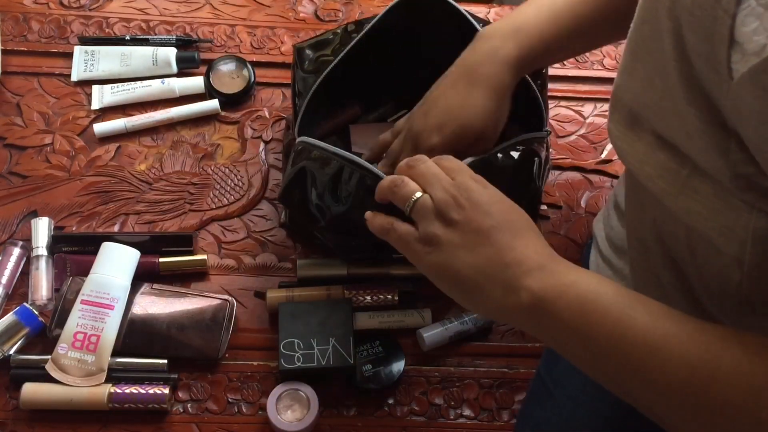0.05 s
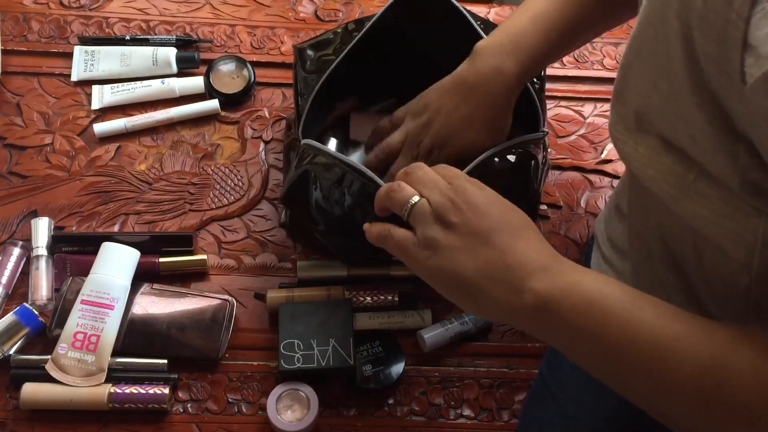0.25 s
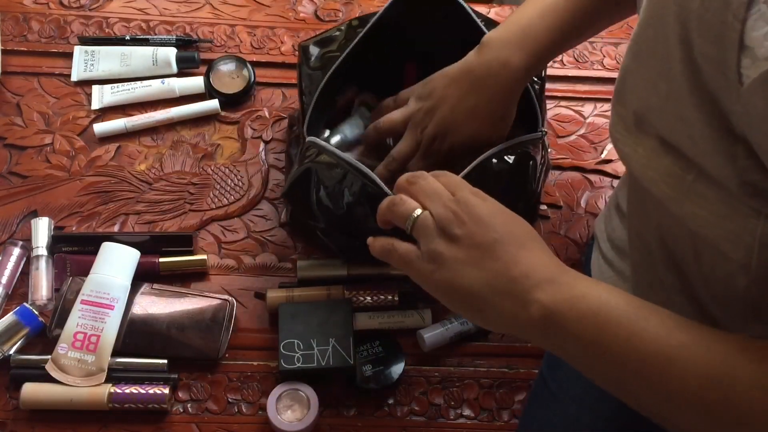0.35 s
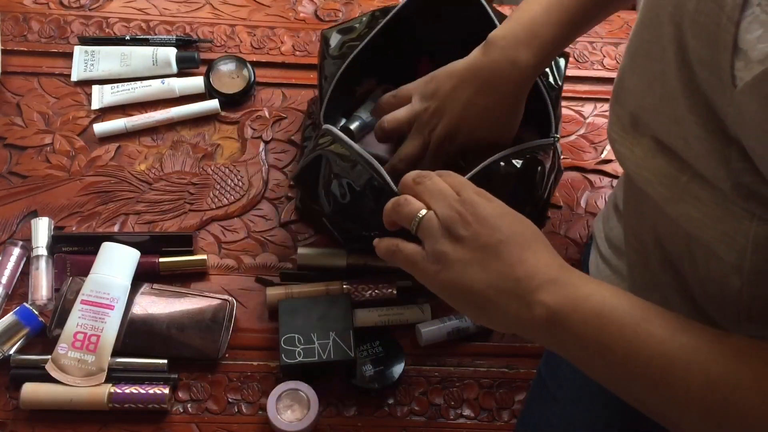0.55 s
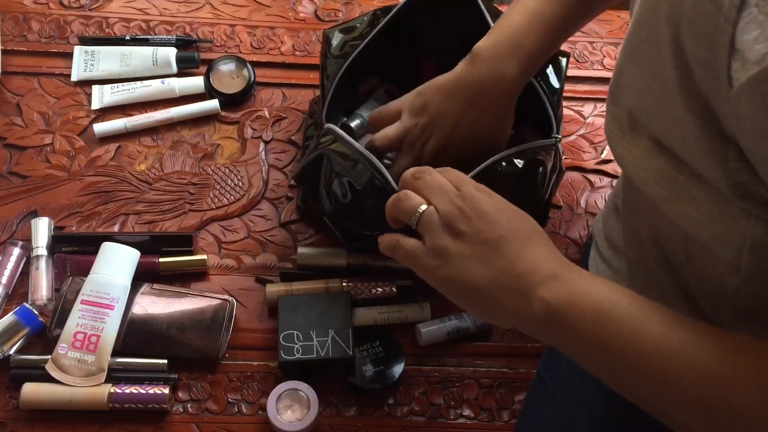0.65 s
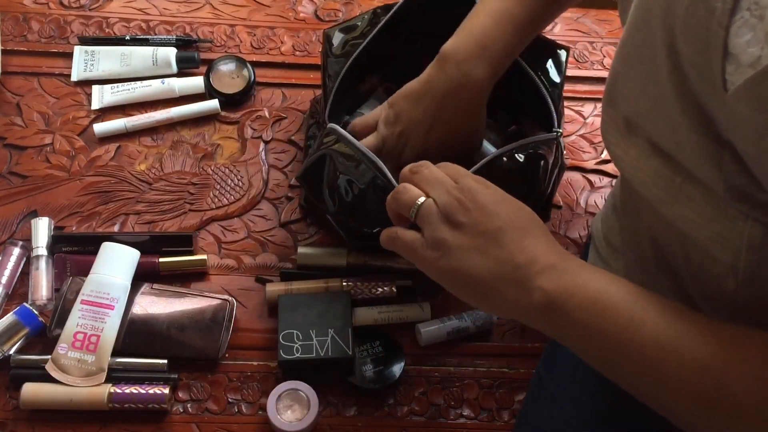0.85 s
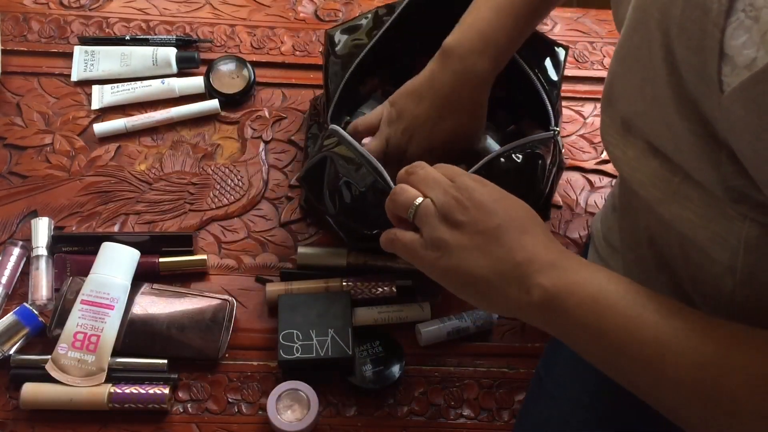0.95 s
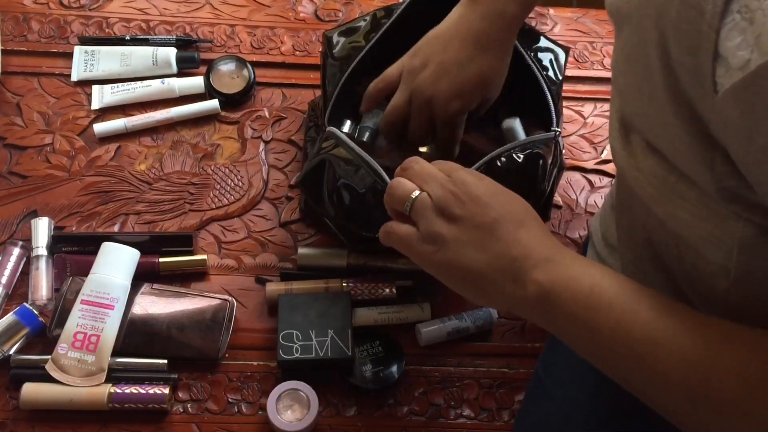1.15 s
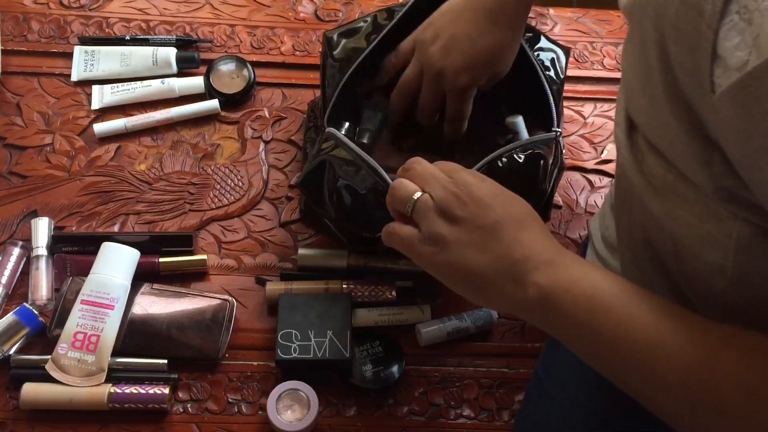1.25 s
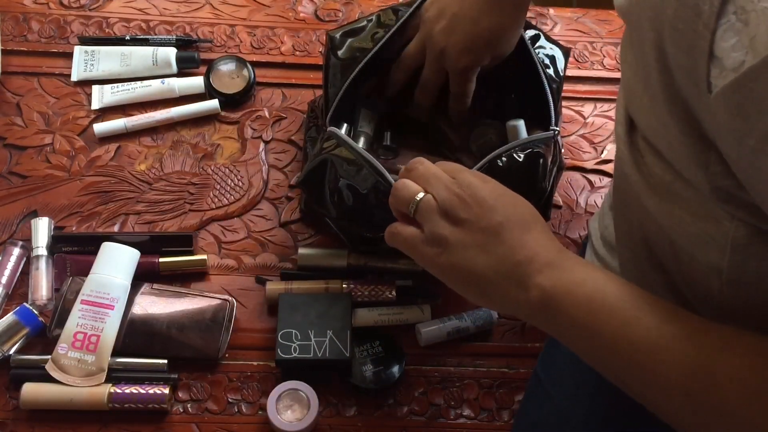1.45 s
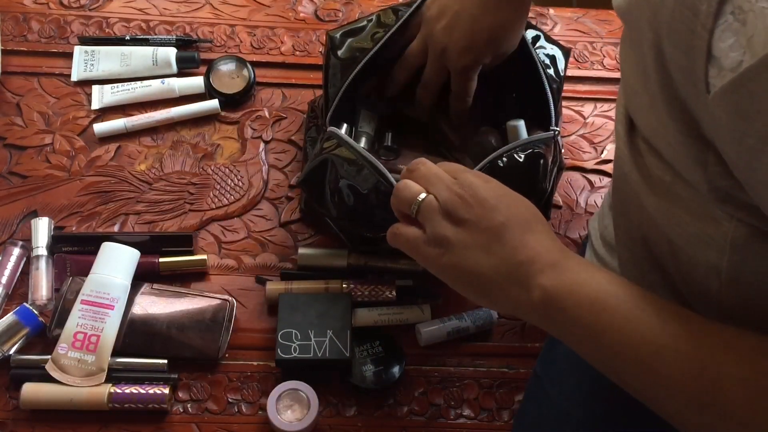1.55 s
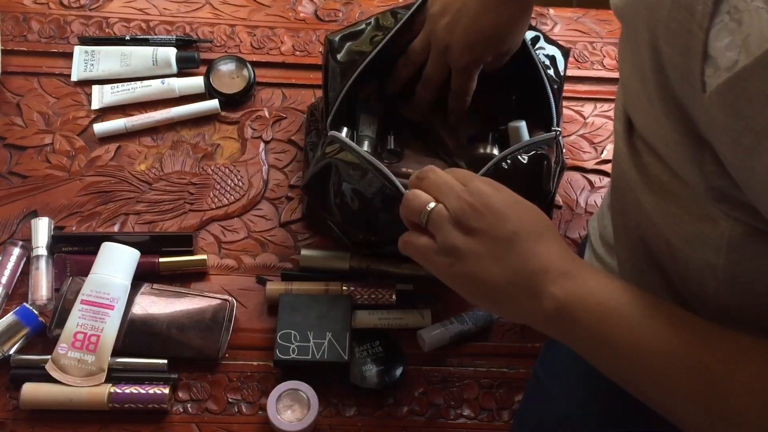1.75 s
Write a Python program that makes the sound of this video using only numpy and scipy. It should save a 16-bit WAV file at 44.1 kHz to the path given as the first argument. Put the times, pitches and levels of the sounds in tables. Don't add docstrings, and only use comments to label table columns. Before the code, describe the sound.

A hand rummages in a vinyl makeup bag: plastic caps click, hollow cases knock and small pieces rattle in two bursts, with soft thumps on a wooden table, close microphone, quiet small room.

```python
import sys
import numpy as np
from scipy import signal
from scipy.fft import rfft, irfft, next_fast_len
from scipy.io import wavfile
from scipy.ndimage import map_coordinates

SR = 44100
rng = np.random.default_rng(int(sys.argv[2]) if len(sys.argv) > 2 else 0)


def gain_from_db(level_db):
    decades = np.asarray(level_db, float) / 20
    return 10 ** decades


def master_out(mix):
    frames = np.transpose(np.atleast_2d(mix))
    ceiling = np.clip(frames, -1, 1)
    pcm = np.round(ceiling * 32767).astype(np.int16)
    wavfile.write(sys.argv[1], SR, pcm)


N = 79380


def unit(x):
    return x / np.sqrt(np.mean(x ** 2) + 1e-20)


def along(points, hz):
    f, v = np.transpose(points)
    return np.interp(np.log(hz + 1), np.log(f + 1), v)


def coloured(x, spectrum):
    m = next_fast_len(N + 8192)
    gain = gain_from_db(along(spectrum, np.fft.rfftfreq(m, 1 / SR)))
    return unit(irfft(rfft(x, m) * gain, m)[:N])


# (frequency [Hz], density [dB per Hz])
HISS_SPECTRUM = [(24, -39.5), (40, -2.5), (2700, -23.5), (3470, -22), (5050, -24.5), (5580, -25),
                 (16000, -35)]


def hiss():
    return gain_from_db(-56) * coloured(rng.standard_normal(N), HISS_SPECTRUM)


# (time [s], level [dB])
HAND_STIRRING = [(0, -46.5), (0.072, -76), (.17, -59.5), (0.219, -44), (.37, -41), (0.436, -23.5),
                 (0.549, -37.5), (.69, -56.5), (.76, -47.5), (.86, -60.5), (0.962, -55), (1.04, -32),
                 (1.162, -43), (1.3, -31.5), (1.45, -37.5), (1.587, -47.5), (1.64, -74), (1.8, -48)]
# (frequency [Hz], density [dB per Hz])
HEAP_SPECTRUM = [(24, -49), (40, -6), (91, 6.5), (176, -11.5), (354, -10), (2380, -16), (4240, -28),
                 (13400, -33.5), (16000, -47.5)]


def chatter(count=3000):
    hand_db = np.interp(np.arange(N) / SR, *np.transpose(HAND_STIRRING))
    samples = np.arange(500)[None]
    u, t = rng.random((count, 4)), samples / SR
    start, hz = (u[:, 0] * N).astype(int), 250 * 60 ** u[:, 1:2]
    size = gain_from_db(along(HEAP_SPECTRUM, hz) + 4.15 * np.log2(hz / 1000) + 11.7 * u[:, 2:3] ** 3)
    decay = gain_from_db(-60 * t * hz / (5 + 9 * u[:, 3:]))
    onset = 1 - np.exp(-t * hz * 2.0)
    grains = size * decay * np.sin(2 * np.pi * hz * t) * onset
    ticks = np.bincount((start[:, None] + samples).ravel(), grains.ravel(), N)[:N]
    lumps = map_coordinates(rng.standard_normal(200), [np.arange(N) * 60 / SR])
    slide = coloured(rng.standard_normal(N), HEAP_SPECTRUM) * gain_from_db(7.5 * lumps)
    return gain_from_db(hand_db) * (gain_from_db(1.5) * unit(ticks) + gain_from_db(-5.5) * slide)


# (time [s], peak level [dB], centre [Hz], width over centre [ratio])
CASE_KNOCKS = [(0.005, -33, 595, 0.79), (0.183, -14, 890, 1.9), (0.185, -23, 360, 0.18),
               (0.22, -28, 223, .5), (0.246, -21, 1450, 0.3), (0.247, -25.5, 500, 1.7),
               (0.283, -21.5, 1920, 0.13), (0.352, -11.5, 580, 1.2), (0.387, -19.5, 1330, 0.18),
               (0.398, -21, 450, 1.4), (0.408, -10, 1930, 0.36), (0.424, -19.5, 380, 0.57),
               (0.441, -13, 490, 0.57), (0.448, -11, 680, 1.6), (0.448, -9, 1800, 0.41),
               (0.476, -19, 380, 0.37), (0.491, -11, 750, 0.82), (0.524, -21, 1720, 0.2),
               (0.535, -19.5, 684, 0.21), (0.563, -4, 1520, 0.97), (0.565, -15.5, 500, 1.3),
               (0.619, -30.5, 350, 0.21), (0.634, -26, 1390, 0.21), (0.66, -25.5, 1290, 1.4),
               (0.77, -31, 885, 1.8), (0.784, -16.5, 2130, .6), (0.787, -20.5, 390, 1.7),
               (0.975, -29, 680, .6), (0.99, -23, 1704, 0.081), (1.004, -28, 1650, 0.16),
               (1.027, -8.5, 527, 1.37), (1.032, -10.5, 422, 0.46), (1.039, -10.5, 397, 0.87),
               (1.056, -23, 410, 1.1), (1.1, -18.5, 604, 1.1), (1.117, -19, 670, 1.6),
               (1.182, -20.5, 362, 0.53), (1.237, -16.5, 495, 2.1), (1.27, -14, 1410, 1.5),
               (1.291, -16, 500, 1.5), (1.312, -20.5, 284, 0.36), (1.341, -10, 730, 1.85),
               (1.355, -16.5, 456, 0.31), (1.385, -15.5, 900, 0.54), (1.409, -12.5, 690, 1.83),
               (1.521, -15, 670, 1.74), (1.527, -20.5, 423, 0.89), (1.58, -26.5, 450, 0.53),
               (1.708, -34, 452.7, 0.92), (1.723, -26.5, 414, 0.5)]
# (time [s], peak level [dB], centre [Hz], width over centre
LATE_KNOCKS = [
    (0.668, -33, 1880, 0.37),
    (0.678, -33, 1700, 0.69),
    (0.692, -35, 656, 0.45),
    (0.8, -35, 706, 2.1),
    (1.558, -27.5, 1800, 0.45),
    (1.56, -31, 604, 0.74),
    (1.582, -25.5, 1104, 0.83),
    (1.764, -28.5, 410, 0.5),
]


def knocks():
    size, spread_s, top_hz = 8192, 0.001799, 3130
    shudder_db, shudder_s = -24.5, 0.05
    out, t = np.zeros(N + SR), np.arange(size // 2) / SR
    f = np.fft.rfftfreq(size, 1 / SR) + 1
    bend = np.exp(-4j * np.pi * spread_s * (np.sqrt(1000 * f) - .2 * f))
    path = bend / (1 + 1j * f / top_hz) ** 4

    def resonance(hz, width_hz):
        band = 1j * f * width_hz / (hz * hz - f * f + 1j * f * width_hz)
        x = irfft(band ** 2 * path, size)[:len(t)]
        return x / np.abs(x).max()

    for s, db, hz, width in CASE_KNOCKS + LATE_KNOCKS:
        width_hz = hz * np.clip(width, .05, 6)
        blow = resonance(hz, width_hz)
        loose = resonance(hz, width_hz + hz)
        shudder = gain_from_db(shudder_db - 60 * t / shudder_s) * rng.standard_normal(len(t))
        shudder *= gain_from_db(0.83 * rng.standard_normal(len(t)))
        hit = blow + signal.fftconvolve(loose, shudder)[:len(t)]
        out[round(s * SR):][:len(t)] += gain_from_db(db - 1.77) * hit / np.abs(hit).max()
    return out[:N]


# (time [s], peak level [dB], table mode [Hz])
HEAP_THUMPS = [(0.01, -51, 65.4), (0.232, -33, 87), (0.284, -37.5, 66), (0.369, -43, 64), (0.431, -25, 85),
               (0.521, -48, 69.6), (0.777, -34.5, 91), (0.854, -49, 82), (0.908, -52, 79), (0.99, -39, 95),
               (1.029, -17, 77), (1.178, -32, 108), (1.296, -29.5, 101), (1.359, -35, 72),
               (1.45, -36.5, 75), (1.518, -39, 79), (1.577, -41, 81.8), (1.71, -40, 86.9),
               (1.769, -40.5, 85.5)]


def thumps():
    sag, sag_s, rise_s, t60_s = 0.47, 0.013, 0.0082, 0.11
    out, t = np.zeros(N + SR), np.arange(SR // 3) / SR
    for s, db, mode_hz in HEAP_THUMPS:
        waver, swell = (map_coordinates(rng.standard_normal(40), [t * 45]) for _ in range(2))
        hz = mode_hz * (1 + sag * np.exp(-t / sag_s)) * (1 + 0.061 * waver)
        rise = (1 - np.exp(-t / rise_s)) ** 2
        shape = gain_from_db(db + 13.5 + 2.2 * swell - 60 * t / t60_s) * rise
        out[round(s * SR):][:len(t)] += shape * np.sin(2 * np.pi * np.cumsum(hz) / SR)
    return out[:N]


def ring(hz, db, t60, late_s, t):
    hz, db, t60, late_s = (np.asarray(v)[:, None] for v in (hz, db, t60, late_s))
    age = np.maximum(t - late_s, 0)
    modes = gain_from_db(db - 60 * age / t60) * np.sin(2 * np.pi * hz * age)
    return (-1.) ** np.arange(len(hz)) @ modes


# (time [s], peak level [dB], main mode [Hz], treble [dB])
FIRST_SWEEP_CLICKS = [(0.0165, -53, 2780, -36.5), (0.2265, -42, 3170, -27), (0.2462, -26, 3770, -33),
                      (0.2719, -19.5, 3800, -18), (0.2845, -10, 4240, -11.5), (0.291, -35, 4200, 7),
                      (0.3305, -18, 3700, -38), (0.3546, -22, 3830, -17), (0.3627, -26, 3650, -16),
                      (0.3824, -19.5, 3120, -34), (0.395, -19.5, 3700, -26), (0.4057, -11, 3550, -30),
                      (0.4103, -7, 6330, -17.5), (0.4291, 0.5, 3630, -23.5), (0.4487, -12, 3620, -19),
                      (0.4625, -6, 5880, -14.5), (0.4714, -27, 3400, 4), (0.5014, -32, 4100, 2),
                      (0.5176, -17, 5600, -13), (0.5235, -9.5, 4090, -18.5), (0.6324, -57, 2680, -26),
                      (0.7712, -21, 2630, -9), (0.7842, -4.5, 3550, -6.5), (0.8521, -32.5, 2560, -7)]
# (time [s], peak level [dB], main mode [Hz], treble [dB])
SECOND_SWEEP_CLICKS = [(0.9957, -22, 4560, -21), (1.0249, -11, 2900, -15.5), (1.0363, -9.5, 4120, -6.5),
                       (1.0395, -13.5, 2800, -5), (1.056, -9, 4230, -14.5), (1.0653, -6.5, 4150, -11),
                       (1.08, -10, 4400, -8.5), (1.1054, -16, 3200, -34), (1.1146, -14.5, 2500, -33),
                       (1.1348, -11.5, 3220, -4.5), (1.1916, -25, 2700, -13), (1.1983, -17.5, 4100, -14),
                       (1.2191, -14.5, 4500, -15), (1.2429, -6, 4100, -10.5), (1.2477, -6, 4000, -25.5),
                       (1.2706, -16, 2780, -13.5), (1.2957, -6, 4260, -17.5), (1.3145, -8, 2770, -16),
                       (1.318, -15.5, 4200, -8.5), (1.3444, -13, 6040, -17.5), (1.358, -13, 6190, -11.5),
                       (1.365, -10, 5770, -26), (1.3844, -11.5, 2510, -4), (1.4078, 2.5, 4400, -17.5),
                       (1.4684, -20.5, 4090, -5), (1.497, -13.5, 2600, -20), (1.5041, -17, 4000, -16),
                       (1.5877, -36, 4110, -23), (1.7604, -29, 2610, -24), (1.782, -45, 3660, -36)]
# (time [s], peak level [dB], main mode [Hz], treble [dB])
STRAY_TICKS = [(0.7845, -13, 2490, -30), (0.7845, -13, 5260, -25), (0.79, -13, 3540, -12),
               (1.0258, -10.5, 3900, -20), (1.087, -18, 2400, -20), (1.2426, -11.5, 7200, -32),
               (1.2428, -17, 2680, -31.5), (1.3655, -10.5, 7560, -23.5), (1.3765, -15, 5600, -18),
               (1.4076, 0, 6400, -18.5), (1.5375, -36.5, 5950, -19), (1.558, -38, 7260, -14),
               (1.569, -39, 4300, -23), (1.724, -41, 5900, -20)]


def clicks(count=36):
    low_hz, treble_hz, high_hz = 1626, 7400, 15850
    cycles, longest_s, contact_s = 45.7, 0.0094, 0.001097
    side_db, lift_db = -12.5, 17.55
    rattle_s, rattle_db = 0.039, -19.0
    cleaner = 0.17
    out, t = np.zeros(N + SR), np.arange(SR // 10) / SR
    for s, db, main_hz, treble_db in FIRST_SWEEP_CLICKS + SECOND_SWEEP_CLICKS + STRAY_TICKS:
        u = rng.random((4, count + 1))
        hz = low_hz * (high_hz / low_hz) ** ((np.arange(count + 1) + u[0]) / (count + 1))
        level = side_db + 6 * (u[1] - .5) - 4.0 * np.abs(np.log2(hz / main_hz))
        level += (hz > treble_hz) * (treble_db + lift_db)
        hz[0], level[0] = main_hz, 0
        t60 = np.minimum(cycles / hz, longest_s) * (.5 + u[2])
        late_s = contact_s * u[3] ** 2
        tremble = gain_from_db(rattle_db - cleaner * (db + 8.5) - 60 * t / rattle_s) * rng.standard_normal(len(t))
        tremble *= gain_from_db(5.14 * rng.standard_normal(len(t)))
        dull = ring(hz, level, 0.2 * t60, late_s, t[:len(t) // 4])
        hit = ring(hz, level, t60, late_s, t) + signal.fftconvolve(dull, tremble)[:len(t)]
        out[round(s * SR):][:len(t)] += gain_from_db(db) * hit / np.abs(hit).max()
    small_pieces = signal.butter(2, 0.84 * low_hz, "high", fs=SR, output="sos")
    return gain_from_db(-2.5) * signal.sosfilt(small_pieces, out[:N])


# (frequency [Hz], width [Hz], gain [dB])
BODY_MODES = [(271, 38, 6.5), (350, 45, 4), (450, 47, 2.5), (660, 40, 6.5), (1800, 305, 2.5),
              (4210, 1140, 2.5), (4800, 650, -4), (6050, 2360, 2.5), (10280, 740, -9.5)]


def body(x):
    for hz, width, db in BODY_MODES:
        w, g = 2 * np.pi * hz / SR, gain_from_db(db / 2)
        a = np.sin(w) * width / hz / 2
        x = signal.lfilter([1 + a * g, -2 * np.cos(w), 1 - a * g], [1 + a / g, -2 * np.cos(w), 1 - a / g], x)
    return x


# (frequency [Hz], t60 [s])
ROOM_DECAY = [(100, 0.21), (1000, 0.15), (5000, 0.15), (14000, 0.12)]


def room(x, size=2048):
    out = np.zeros(N + SR)
    for k in range(0, N, size):
        hz, t, z = signal.stft(rng.standard_normal(SR // 3), SR, nperseg=256)
        decay = gain_from_db(-60 * t / along(ROOM_DECAY, hz)[:, None])
        tail = signal.istft(z * decay, SR, nperseg=256)[1]
        echo = signal.fftconvolve(x[k:k + size], tail / np.linalg.norm(tail))
        out[k + 200:][:len(echo)] += echo
    return out[:N]


def scene():
    bag = body(clicks() + knocks() + thumps() + chatter())
    return (bag + gain_from_db(-9.5) * room(bag) + hiss())[None]


def top_cut(x):
    return signal.sosfilt(signal.butter(12, 16330, fs=SR, output="sos"), x)


def record(dry):
    low_hz, ceiling, top_hz = 41.6, 1.05, 15850
    x = signal.sosfilt(signal.butter(3, low_hz, "high", fs=SR, output="sos"), dry)
    x = x / (1 + np.abs(x / ceiling) ** 8) ** (1 / 8)
    x = signal.sosfiltfilt(signal.butter(24, top_hz, fs=SR, output="sos"), x)
    return top_cut(x)


dry = scene()
out = record(dry)
master_out(out)
```